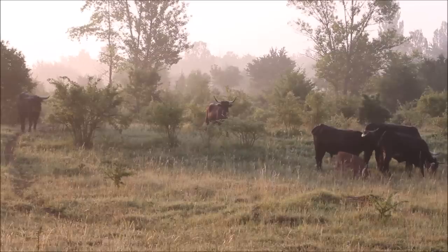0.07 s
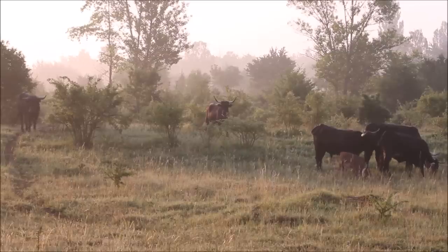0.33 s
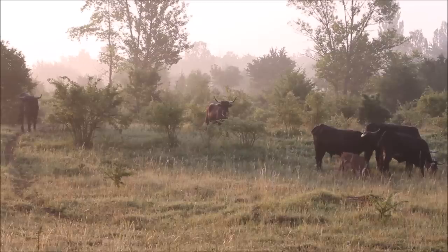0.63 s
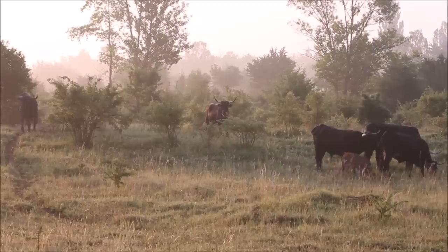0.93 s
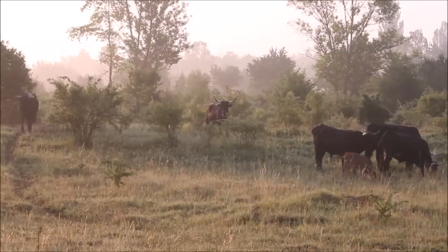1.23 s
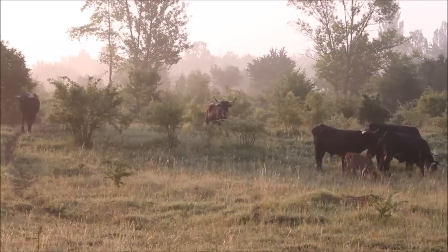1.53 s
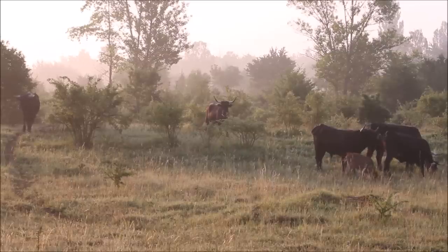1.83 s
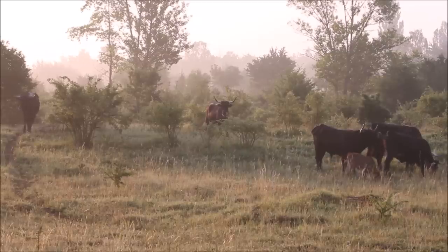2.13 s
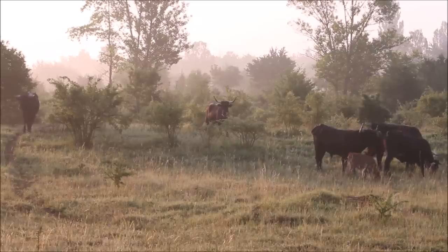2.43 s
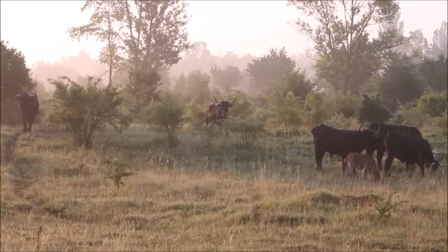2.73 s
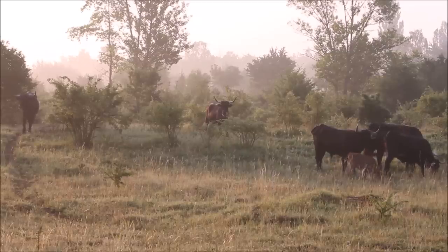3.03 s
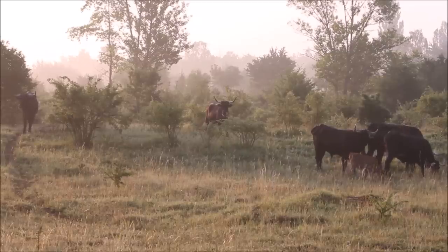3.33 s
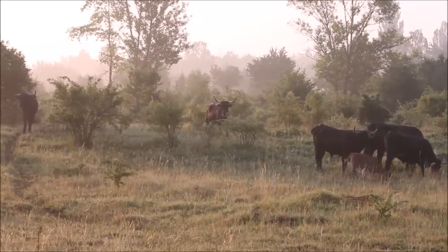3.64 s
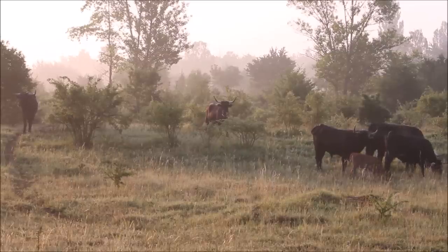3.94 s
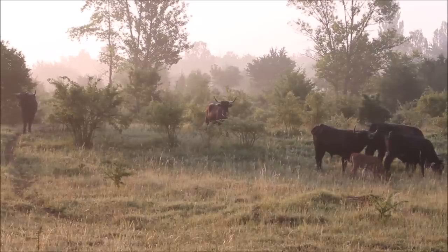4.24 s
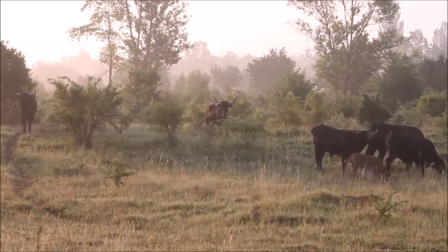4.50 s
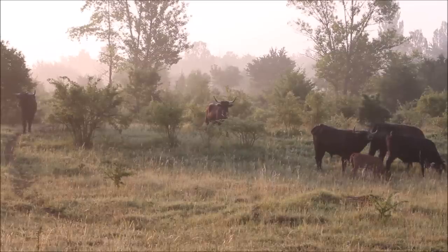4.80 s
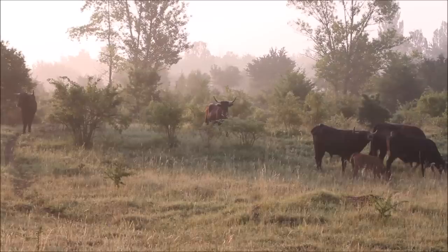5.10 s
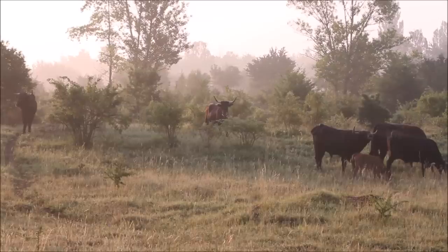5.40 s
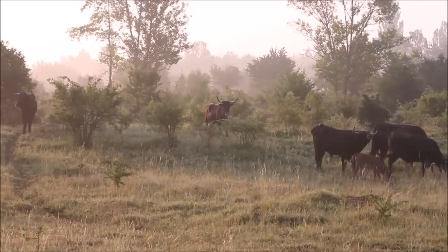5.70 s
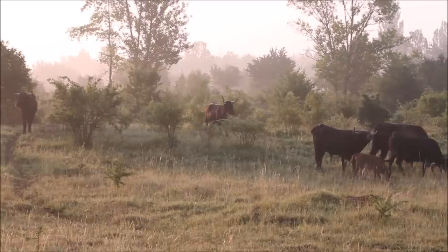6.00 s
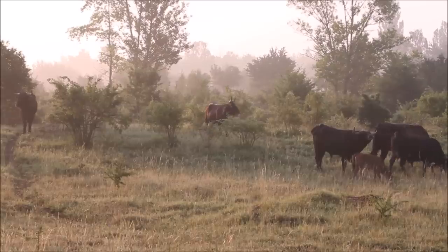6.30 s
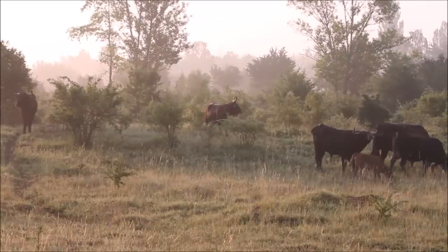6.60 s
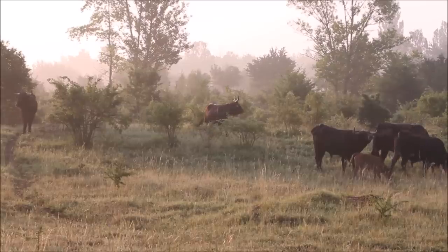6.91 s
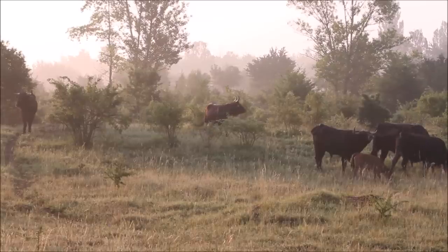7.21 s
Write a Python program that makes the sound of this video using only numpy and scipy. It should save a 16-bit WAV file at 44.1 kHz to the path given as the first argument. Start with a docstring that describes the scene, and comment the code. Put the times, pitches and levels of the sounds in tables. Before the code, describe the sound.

An open meadow is heard through two closely spaced microphones, with soft hiss and low rumble. Throughout, the camera's motor hums low and knocks softly about once a second. Young birds in nearby bushes beg repeatedly with short, buzzy, rasping calls that slide downward, loudest around 1.7 seconds, from 3.2 to 4.5, and at 5.5. A faint breeze in distant trees dies away over the first three or four seconds. Thin whistles and a high, distant twitter come and go. Small close taps sound at the start, around 1.5 seconds and at the end. Between 4.6 and 5.2 seconds a bird gives a quick run of hard chips and falling notes. Distant traffic swells gently from about 5 seconds. At about 6.8 seconds a cow starts a low, hoarse, fairly quiet moo, rising in pitch and still sounding when everything ends near 7.4 seconds.

```python
"""A misty meadow at dawn, on two closely spaced microphones. From the start the camera's own drive
hums and knocks softly about once a second, and young birds in the near bushes beg with buzzy, rasping
down-slurs. A breeze dies away in the far trees; thin whistles, a high twitter and a few taps come through.
Past halfway a bird gives hard chips and far traffic swells. At the very end a cow starts a hoarse moo,
its slack vocal folds flapping through a long throat."""
import sys
import numpy as np
from scipy import signal
from scipy.fft import rfft, irfft, next_fast_len
from scipy.io import wavfile
from scipy.ndimage import uniform_filter1d

SR = 44100
rng = np.random.default_rng(int(sys.argv[2]) if len(sys.argv) > 2 else 0)


def store_pcm(level_fs):
    """Save levels as 16-bit WAV."""
    pcm = np.round(np.clip(level_fs, -1, 1) * 32767).astype(np.int16)
    wavfile.write(sys.argv[1], SR, np.atleast_2d(pcm).T)


N = 324119
T = np.arange(N) / SR

# Noise colours of the open meadow. Each row: frequency in Hz, relative spectral density in dB.
AIR_COLOUR = [(100, -4), (240, 0.5), (350, -4), (550, -6), (950, -8.5), (1250, -16), (1650, -18.5),
              (2200, -20), (2900, -21), (3900, -12), (5200, -23), (6500, -29.5), (8500, -29), (15500, -32)]  # still air, a far chorus and microphone hiss
SIDE_COLOUR = [(30, 6), (60, 8), (110, 0), (260, 0), (700, 1.5), (1050, 2.5), (2000, -1), (15500, -.5)]  # what the two microphones do not share, mostly their own hiss
RUMBLE_COLOUR = [(20, -7), (35, 7.5), (47, 2), (62, 3.5), (80, -9.5), (100, -6.5), (160, -15.5), (260, -16),
                 (500, -39)]
TRAFFIC_COLOUR = [(200, -17), (450, -10.5), (660, -0.5), (900, -8), (1250, -22), (2500, -64)]
# Breeze and traffic, both far off. Each row: time in seconds, relative level in dB.
BREEZE_FADE = [(0, -48), (.6, -49), (1.4, -51.5), (2.2, -54.5), (3.5, -56), (7.35, -80)]
TRAFFIC_SWELL = [(0, -72), (2, -61.5), (4.7, -57.5), (5.3, -50.5), (6.1, -49), (6.6, -45.5), (7, -43.5),
                 (7.35, -46.5)]
# One knock of the drive, right at the microphones. Each row: delay in seconds, relative push.
KNOCK_JOLTS = [(.0058, -1.9), (.018, 1.1), (.033, 1.7)]
# The course of the cow's moo. Each row: time in seconds, pitch in Hz, relative level in dB.
MOO_COURSE = [(6.7, 62, -66), (6.9, 66, -49.5), (7.1, 72.1, -47.5), (7.22, 77.8, -44.5), (7.29, 83.6, -42),
              (7.35, 86.6, -45.5)]
# Resonances of the voices. Each row: centre in Hz, nominal width in Hz, relative gain in dB.
COW_THROAT = [(98, 44, 13), (197, 79, 5), (473, 260, -4), (690, 130, -22), (1134, 110, -13),
              (1480, 140, -8.5), (1877, 100, -12), (2030, 100, -14.5), (2644, 56, -9), (3130, 270, -11.5)]
BIRD_BEAK = [(2280, 600, -6), (2890, 290, -5), (3340, 670, -1.5), (3950, 700, 2.5), (5020, 310, -3),
             (5820, 1100, -14.5), (7300, 2000, -19.5)]
# Small taps and snaps near the microphones.
# Each row: start in seconds, centre in Hz, nominal width in Hz, decay in seconds, opening level in dB.
NEAR_TAPS = [(0.144, 2000, 2400, 0.0048, -38), (.365, 4500, 6000, 0.004, -42),
             (1.395, 286, 120, 0.015, -32.5), (1.44, 1010, 280, 0.0041, -30.5),
             (1.541, 396, 450, 0.0062, -35), (1.542, 2500, 3920, 0.0018, -38.5),
             (7.281, 2700, 1800, 0.0073, -37)]
# Twitter phrases of a small songbird, far off.
# Each row: start in seconds, length in seconds, pitch in Hz, relative level in dB.
TWITTER_PHRASES = [(0.154, 0.8, 5510, -62.5), (2.72, 0.85, 5430, -58), (3.8, 0.45, 5500, -61),
                   (4.895, 0.7, 5320, -56.5), (5.698, 0.79, 5410, -59.5), (6.904, 0.28, 5270, -72)]
# Its runs of steep falling ticks. Each row: start in seconds, number of ticks, level in dB.
SONGBIRD_TICKS = [(2.956, 2, -54), (3.618, 4, -49), (3.836, 2, -56), (5.76, 1, -47.5), (6.368, 1, -50.5),
                  (6.43, 1, -56), (6.87, 1, -55)]
# Its longer slurs, and thin whistles from birds beyond the bushes.
# Each row: start in seconds, length in seconds, pitch in Hz, glide as a share of the pitch, level in dB.
SONGBIRD_SLURS = [(0.17, 0.037, 6200, 0.046, -58.5), (0.373, .06, 4770, -.1, -53),
                  (0.493, 0.045, 5300, 0.049, -55), (0.692, .048, 5260, 0.057, -56),
                  (1.045, .04, 5200, 0.023, -55), (2.797, 0.052, 5630, 0.13, -54),
                  (3.123, 0.047, 5150, .11, -49), (3.77, 0.049, 5150, .1, -53),
                  (5.825, 0.014, 5200, 0.18, -47), (5.912, 0.033, 5660, 0.04, -48),
                  (6.196, 0.039, 5060, 0.12, -50)]
FAR_WHISTLES = [(.01, .035, 2810, -.02, -51.5), (.07, .045, 2860, 0, -52), (.135, .135, 2900, -.02, -55),
                (.341, .03, 2780, -.02, -51), (.2, .1, 3780, 0, -58), (.73, .07, 3780, 0, -57),
                (.775, .05, 2370, -.08, -54), (1.115, .11, 2790, .04, -54), (1.24, .11, 2870, 0, -55),
                (1.455, .03, 2780, -.03, -48.5), (1.483, .09, 2620, -.03, -55.5),
                (1.939, .075, 2330, -.04, -56), (4.215, .08, 2620, .06, -59), (6.13, .075, 2500, .09, -59),
                (6.08, .175, 3836, .019, -47.5), (6.595, .14, 3810, .035, -49)]
# The falling notes of "tew" and "tchick" calls. Each row: start in seconds, pitch in Hz, level in dB.
TEW_NOTES = [(.815, 4210, -47.5), (.862, 3860, -51), (1.458, 3910, -51), (1.57, 3810, -53),
             (3.172, 3770, -47), (4.633, 3600, -41), (4.801, 3580, -40), (4.945, 3835, -39.5),
             (5.076, 3950, -42), (5.198, 3970, -43.5)]
TCHICK_NOTES = [(4.647, 3020, -45), (4.856, 3280, -34), (5.057, 3334, -32.5)]
# Young birds begging in the near bushes. Each row: start in seconds, length in seconds,
# starting pitch in Hz, relative level in dB, rasp from 0 to 1, tilt of the rasp in dB per octave.
BEGGING_CALLS = [(-.08, 0.2, 4460, -42, 0.42, -2), (0.313, .14, 5900, -48, 0.86, 8),
                 (0.347, 0.083, 2495, -48, 0.21, -6), (1.163, .18, 4200, -44.5, 0.46, 0),
                 (1.284, .17, 4130, -35.5, 0.76, -10.5), (1.649, .2, 4480, -31.5, 0.12, 7),
                 (1.772, .13, 4860, -40.5, 0.6, 2), (1.965, 0.26, 4370, -46.5, 0.65, -8),
                 (2.319, .18, 4620, -42, 0.32, 5), (2.474, 0.17, 4310, -42, 0.28, 3),
                 (2.641, 0.32, 4306, -43.5, .55, -1), (3.222, .18, 4410, -32, 0.14, 9),
                 (3.377, 0.18, 4195, -30, 0.7, -2), (3.537, 0.15, 4000, -43.5, 0.46, -6),
                 (3.95, 0.12, 4900, -31.5, .78, 7.5), (3.998, .14, 4126, -30, .42, -8),
                 (4.358, .19, 4440, -32, 0.2, 2), (4.513, 0.19, 4125, -40, .64, 0.5),
                 (5.524, .19, 4512, -30.5, 0.2, 4), (5.69, 0.23, 4470, -47.5, 0.98, 6),
                 (6.396, .26, 3970, -39, 0.79, -6), (6.974, 0.33, 4246, -41.5, .66, -5)]


def undb(db):
    """Decibels to gain."""
    return 10 ** (np.asarray(db) / 20)


def level(x, db):
    """Scale to an rms level."""
    return x * undb(db) / np.sqrt(np.mean(x ** 2))


def curves(rows):
    """The columns of a table of timed rows, one value a sample, held beyond its ends."""
    s, *columns = np.transpose(rows)
    return [np.interp(T, s, c) for c in columns]


def add(out, s, x):
    """Mix a short sound in at s seconds."""
    i = int(s * SR)
    x, i = x[max(-i, 0):], max(i, 0)
    out[i:i + len(x)] += x[:max(N - i, 0)]


def wander(n, rate_hz):
    """A smooth random drift with a spread near 1."""
    k = max(int(SR / rate_hz), 2)
    steps = np.repeat(rng.standard_normal(n // k + 2), k)
    return 1.25 * uniform_filter1d(steps, k)[:n]


def resonate(x, hz, *widths_hz):
    """One resonance per width, in series, with gain 1 at their common centre."""
    for width in widths_hz:
        x = signal.lfilter(*signal.iirpeak(hz, hz / width, fs=SR), x)
    return x


def noise(colour, db):
    """Noise with a spectrum of (Hz, dB) points."""
    hz, gain_db = np.transpose(colour)
    n = next_fast_len(N)
    f = np.maximum(np.fft.rfftfreq(n, 1 / SR), 1)
    shape = undb(np.interp(np.log(f), np.log(np.sort(hz)), gain_db))
    return level(irfft(rfft(rng.standard_normal(n)) * shape, n)[:N], db)


def scatter(x, t60, wet_db):
    """A diffuse tail of echoes from leaves and trunks."""
    t = np.arange(SR) / SR
    tail = rng.standard_normal(SR) * np.exp(-np.log(1000) * t / t60) * (1 - np.exp(-t / 0.01))
    return undb(wet_db) * signal.fftconvolve(x, tail / np.linalg.norm(tail))[:N]


def meadow():
    """The stereo bed: air and microphone hiss, a dying breeze, low rumble and a swell of far traffic."""
    air = noise(AIR_COLOUR, -45) * undb(0.98 * wander(N, 5.8))
    trees = level(resonate(rng.standard_normal(N), 416, 290, 290), 0.66)
    breeze = trees * undb(curves(BREEZE_FADE)[0] + wander(N, 6.2))
    traffic = noise(TRAFFIC_COLOUR, 0) * undb(curves(TRAFFIC_SWELL)[0] + wander(N, 10))
    side = noise(SIDE_COLOUR, -53.6)
    rumble = noise(RUMBLE_COLOUR, -38.5)
    return air + breeze + traffic + rumble + np.array([side, -side])


def camera_drive(turn_hz=39.49, turns_per_knock=43, push_ms=1.91, case_hz=42, case_width_hz=62):
    """Each turn of the camera's drive nudges the case; every so often it knocks and misses two nudges."""
    pushes = np.zeros(N)
    uneven_db = 1.05 * rng.standard_normal(int(N / SR * turn_hz))
    for turn, db in enumerate(uneven_db):
        s, step = .036 + turn / turn_hz, turn % turns_per_knock
        if step not in (4, 5):
            add(pushes, s, -undb([db]))
        if step == 2:
            for delay, push in KNOCK_JOLTS:
                add(pushes, s + delay, np.array([push]))
    # the soft mounting rounds each push, and the case swings back once
    ms = np.arange(-SR // 100, SR // 100) / SR * 1000
    rounded = signal.fftconvolve(pushes, np.exp(-.5 * (ms / push_ms) ** 2), "same")
    swing = signal.bilinear([1, 0, 0], [1, 2 * np.pi * case_width_hz, (2 * np.pi * case_hz) ** 2], SR)
    return level(signal.lfilter(*swing, rounded), -35)


def cow(jitter=.05, hoarse=0.63):
    """Slack vocal folds flap unevenly, each flap with a rush of air, through the long throat."""
    hz, db = curves(MOO_COURSE)
    cycles = np.cumsum(hz * (1 + jitter * wander(N, 70))) / SR
    flaps = np.diff(np.floor(cycles), prepend=0) * undb(3.1 * wander(N, 80))
    rush = rng.standard_normal(N) * np.exp(-(cycles % 1) / .5)
    folds = level(flaps, 0) + hoarse * level(rush, 0)
    throat = sum(undb(gain_db) * resonate(folds, centre, 0.81 * width, width)
                 for centre, width, gain_db in COW_THROAT)
    voice = level(throat, 3.4) * undb(db)
    return voice + scatter(voice, t60=0.61, wet_db=-2)


def taps():
    """Close by, brief bursts of noise each ring one broad resonance."""
    out, t = np.zeros(N), np.arange(SR // 10) / SR
    for s, hz, width, decay, db in NEAR_TAPS:
        ring = resonate(rng.standard_normal(len(t)), hz, width, width)
        add(out, s, level(ring, db) * np.exp(-t / decay))
    return out


def note(length, pitch_hz, glide, db, arch=0):
    """A bird's whistle gliding through its pitch, bowed upwards in the middle by the share `arch`."""
    u = np.linspace(0, 1, int(length * SR))
    bow = 4 * u * (1 - u)
    waver = min(.00035 / length, .02)  # held notes are steadiest
    contour = 1 + glide * (u - .5) + arch * (bow - .5)
    hz = pitch_hz * contour * (1 + waver * wander(len(u), 306))
    phase = 2 * np.pi * np.cumsum(hz) / SR
    octave = undb(-27 + 1.06 * (db + 42.5))  # grows with the force of the note
    tone = np.sin(phase) + octave * np.sin(2 * phase)
    flutter = undb(wander(len(u), 68.3))
    return level(tone * bow ** 0.41 * flutter, db)


def twitter(per_second=34, slur_s=(0.0074, 0.0282), spread_db=9):
    """Quick, steep slurs up and down, blurred by distance."""
    out = np.zeros(N)
    for s, length, pitch_hz, db in TWITTER_PHRASES:
        count = max(int(length * per_second), 1)
        for k, (late, long, high, slope, loud) in enumerate(rng.random((50, 5))[:count]):
            hz = pitch_hz * (1 + .32 * (high - .5))
            glide = .4 * (slope - .6)
            slur = note(np.interp(long, [0, 1], slur_s), hz, glide, db + spread_db * (loud - .5))
            add(out, s + length * (k + late) / count, slur)
    return .8 * out + scatter(out, t60=.3, wet_db=-3)


def songbird(tick_gap_s=.0365):
    """A far, high twitter from which longer slurs and even runs of ticks stand out."""
    out = twitter()
    for s, *shape in SONGBIRD_SLURS:
        add(out, s, note(*shape, arch=0.023))
    for s, count, db in SONGBIRD_TICKS:
        for k in range(round(count)):
            add(out, s + k * tick_gap_s, note(length=0.0136, pitch_hz=5600, glide=-0.13, db=db))
    return out


def clear_calls(flick_leads_s=(.019, 0.00202)):
    """Falling tews, hard tchicks (two upward flicks into a falling note) and thin whistles further off."""
    out = np.zeros(N)
    for s, hz, db in TEW_NOTES:
        add(out, s, note(length=0.0344, pitch_hz=hz, glide=-0.069, db=db))
    for s, hz, db in TCHICK_NOTES:
        add(out, s, note(length=0.017, pitch_hz=hz, glide=-0.095, db=db))
        for lead in flick_leads_s:
            add(out, s - lead, note(length=.006, pitch_hz=2700, glide=0.49, db=db - 10))
    for s, *shape in FAR_WHISTLES:
        add(out, s, note(*shape, arch=0.0072))
    return out


def begging_tone(u, buzz, start_hz, fall, swing_hz=190, jitter_hz=130, under_hz=2060):
    """A buzz-shaken tone sags ever faster as u runs from 0 to 1; its faint, rough undertone does not."""
    n = len(u)
    calming = 1.3 - 0.38 * u
    shake = (swing_hz * np.cos(buzz) + jitter_hz * wander(n, 1400)) * calming
    phase = 2 * np.pi * np.cumsum(start_hz * (1 - fall * u ** 1.8) + shake) / SR
    undertone = np.sin(2 * np.pi * np.cumsum(under_hz + shake) / SR + wander(n, 500))
    overtone = np.sin(1.4 * phase + .5 * wander(n, 500))
    throb = 1 + 0.27 * np.sin(buzz)
    return (np.sin(phase) + undb(-23) * undertone + undb(-27) * overtone) * throb


def beak_rasp(buzz, tilt_db):
    """Each beat of the buzz sends a burst of noise through the resonances of throat and beak."""
    bursts = rng.standard_normal(len(buzz)) * np.exp(1.35 * np.sin(buzz))
    out, pivot_hz = np.zeros(len(buzz)), BIRD_BEAK[3][0]
    for k, (hz, width, gain_db) in enumerate(BIRD_BEAK):
        gain = undb(gain_db + tilt_db * np.log2(hz / pivot_hz))
        out += (-1) ** k * gain * resonate(bursts, hz, 1.2 * width, 1.2 * width)
    return out


def begging_call(length, start_hz, db, rasp, tilt_db):
    """A young bird's uneven buzz drives both tone and rasp; harsh calls rattle slower and fall less."""
    u = np.linspace(0, 1, int(length * SR))
    rasp = np.clip(rasp, 0, .95)
    buzz_hz = np.interp(rasp, [0, 1], [134.33, 92.1])
    fall = np.interp(rasp, [0, 1], [.235, .07])  # share of the pitch
    buzz = 2 * np.pi * np.cumsum(buzz_hz * (1 + 0.1636 * wander(len(u), 149.9))) / SR
    swell = undb(np.interp(u, [0, 0.52, 1], [-7.5, 0, -8]))
    clear = level(begging_tone(u, buzz, start_hz, fall), db) * swell
    harsh = level(beak_rasp(buzz, tilt_db), db - 5) * swell ** 0.1
    gate = np.minimum(1, np.minimum(u, 1 - u) / .07)
    return (np.sqrt(1 - rasp ** 2) * clear + rasp * harsh) * gate


def birds():
    """All the birds, straight ahead; near bushes smear the calls and the tree line answers faintly."""
    song = clear_calls() + songbird()
    begging = np.zeros(N)
    for s, *call in BEGGING_CALLS:
        add(begging, s, begging_call(*call))
    begging += scatter(begging, t60=0.023, wet_db=-3.5)
    song += scatter(song, t60=0.021, wet_db=-7)
    near = begging + song
    return near + scatter(near, t60=0.69, wet_db=-14.5)


def scene():
    """Everything at the two closely spaced microphones."""
    return birds() + meadow() + cow() + taps() + camera_drive()


def record(dry):
    """The camera cuts the top steeply above 15.8 kHz."""
    return signal.sosfilt(signal.ellip(10, .1, 80, 15800, fs=SR, output="sos"), dry)


dry = scene()
out = record(dry)
store_pcm(out)
```